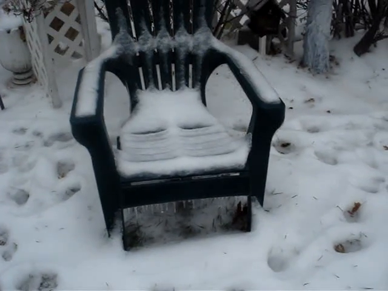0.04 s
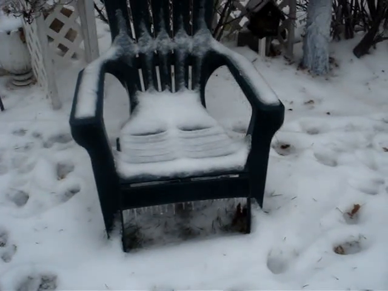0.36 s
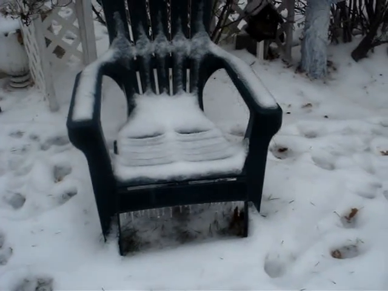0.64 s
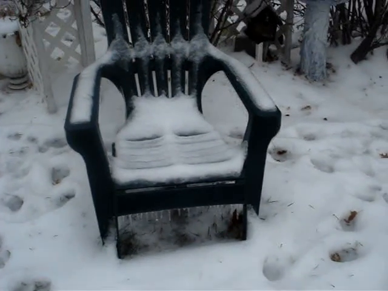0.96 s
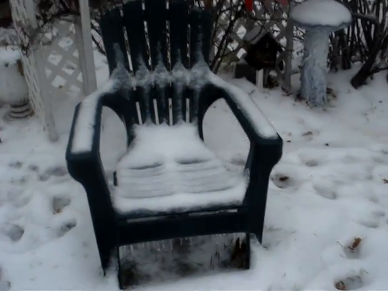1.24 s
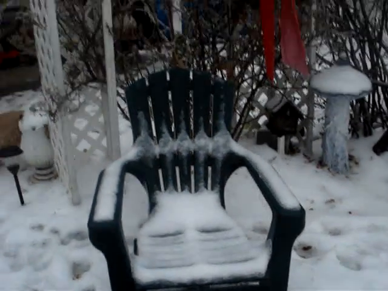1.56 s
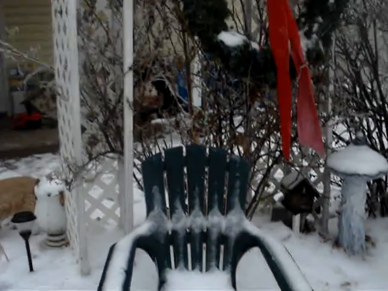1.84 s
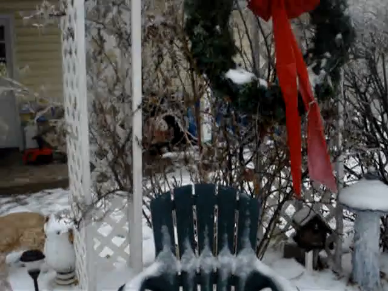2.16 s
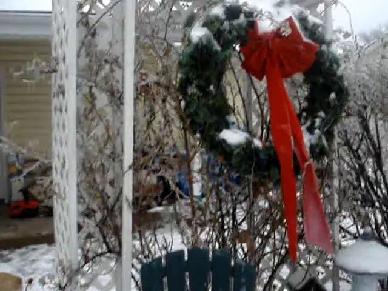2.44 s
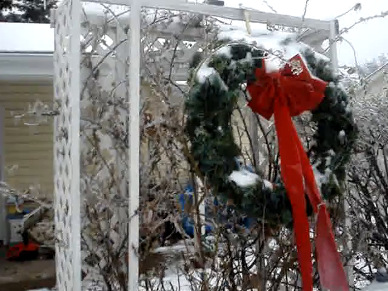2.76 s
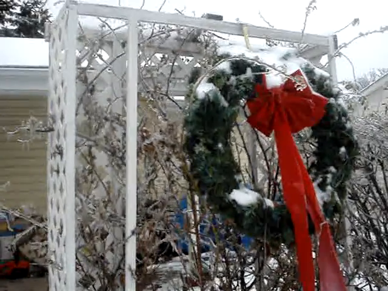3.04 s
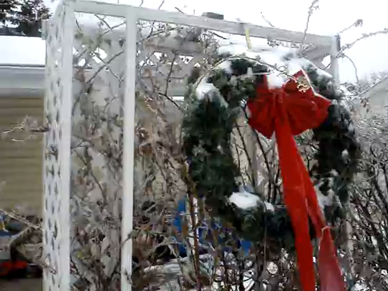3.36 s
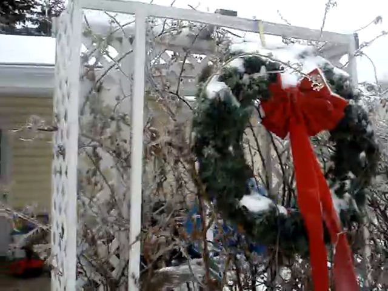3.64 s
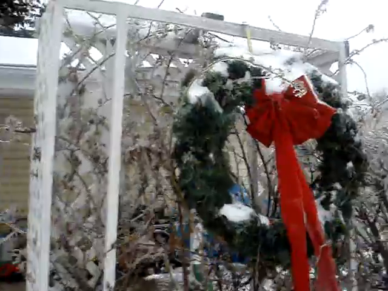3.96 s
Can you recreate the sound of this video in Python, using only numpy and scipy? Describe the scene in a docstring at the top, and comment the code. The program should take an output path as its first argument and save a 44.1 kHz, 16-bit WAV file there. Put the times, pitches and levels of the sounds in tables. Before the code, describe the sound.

Footsteps crunch on ice-crusted snow in a garden. The crust first cracks and scuffs as someone shifts, then come two slow steps, one crisp, one deeper. Freezing rain hisses faintly, and the hand-held microphone picks up soft bumps.

```python
"""Freezing rain hisses on a snowy garden throughout. At first someone shifts on ice-crusted snow:
the crust cracks and scuffs, ice ticks nearby, and a hand-held camera gives soft bumps and a faint scrape.
Just after 2 s comes a slow, crisp step: the crust crumbles into grains and the snow under it gives way
in short hollow pops. A second, deeper step follows near 3.4 s."""
import sys
import numpy as np
from scipy import signal
from scipy.fft import rfft, irfft, next_fast_len
from scipy.io import wavfile
from scipy.ndimage import map_coordinates

SR = 44100
rng = np.random.default_rng(int(sys.argv[2]) if len(sys.argv) > 2 else 0)


def generate_wav(signal):
    """Clip the signal to [-1, 1] and save it as 16-bit WAV at the path in sys.argv[1]."""
    frames = np.transpose(np.atleast_2d(signal))
    scaled = np.clip(frames, -1, 1) * 32767
    pcm = np.round(scaled).astype(np.int16)
    wavfile.write(sys.argv[1], SR, pcm)


N = 176400
T = np.arange(N) / SR
EVENT_T = T[:SR // 4]  # seconds since the start of one short sound


def amp(db):
    """Decibels to gain."""
    return 10 ** (np.asarray(db) / 20)


def unit(x):
    """Scale to rms 1."""
    return x / np.sqrt(np.mean(x ** 2) + 1e-20)


def eq_curve(points, hz):
    """Gain in dB at hz, joining (Hz, dB) points on a log frequency axis."""
    freqs, gains = np.transpose(points)
    return np.interp(np.log(hz + 1), np.log(freqs + 1), gains)


def coloured(x, gain_db):
    """Equalise x with a dB gain that is a function of frequency, then scale to rms 1."""
    hz = np.fft.rfftfreq(len(x), 1 / SR)
    return unit(irfft(rfft(x) * amp(gain_db(hz)), len(x)))


def fader(points):
    """A gain ride through (seconds, dB) points, silent before and after."""
    return amp(np.interp(T, *np.transpose(points), left=-120, right=-120))


def add(track, start, sound):
    """Mix a sound into the track, start seconds in."""
    part = track[max(0, int(start * SR)):][:len(sound)]
    part += sound[:len(part)]


def wobble(per_s):
    """A smooth curve through per_s random values a second."""
    return map_coordinates(rng.standard_normal(400), [T * per_s], mode="mirror")


def grains(per_s, spread_db, length, band_count=5):
    """Crackle at rms 1: grains of several sizes, each size falling per_s times a second in its own band."""
    hits = rng.random((band_count, length)) < per_s / SR
    polarity = rng.choice([-1, 1], hits.shape)
    strength = amp(spread_db * np.minimum(rng.exponential(size=hits.shape), 3))
    hz = np.fft.rfftfreq(length, 1 / SR)
    centres_hz = np.geomspace(700, 8000, band_count)
    bands = [np.sqrt(np.interp(hz, centres_hz, own)) for own in np.eye(band_count)]
    spectra = rfft(hits * polarity * strength) * bands
    return unit(irfft(spectra.sum(axis=0), length))


def pulse(hz, cycles):
    """A heavily damped ring whose envelope peaks after the given number of cycles."""
    age = EVENT_T * hz / cycles
    return age ** 2 * np.exp(2 * (1 - age)) * np.sin(2 * np.pi * hz * EVENT_T)


# The level ride of the rain. Each row: time in seconds, level in dB.
RAIN_RIDE = [(0, -47), (.3, -49.5), (.7, -49.5), (.85, -49.5), (1.2, -49), (1.4, -47.5), (1.65, -47.5),
             (2.0, -47.5), (2.7, -48), (3.3, -47), (3.85, -48.5), (4.0, -48.5)]
# The tone of the far wash and of the near patter. Each row: frequency in Hz, relative gain in dB.
WASH_EQ = [(20, -14), (45, -0.5), (75, 2), (160, 1), (350, 2), (520, 2), (750, -1.5), (1500, -3),
           (2300, -6), (3500, -10), (5000, -17.5), (7000, -20), (10000, -30)]
PATTER_EQ = [(200, -26), (900, 3.5), (2000, -2), (3800, -4.5), (6500, -7), (10000, -16.5)]
def rain():
    """The bed: a far wash of sleet, with nearer pellets pattering on ice and twigs."""
    wash = coloured(rng.standard_normal(N), lambda hz: eq_curve(WASH_EQ, hz))
    wash *= amp(.5 * wobble(per_s=25.16))
    pellets = grains(per_s=700, spread_db=2.5, length=N)
    patter = coloured(pellets, lambda hz: eq_curve(PATTER_EQ, hz))
    patter *= amp(-6 + 2.5 * wobble(per_s=29.94))  # sits under the wash and flutters more
    return amp(np.interp(T, *np.transpose(RAIN_RIDE))) * (wash + patter)


# The level ride of the scrape. Each row: time in seconds, level in dB.
SCRAPE_RIDE = [(1.3, -61), (1.43, -56), (1.55, -56), (1.68, -54), (1.78, -63), (1.95, -58)]
def scrape(centre_hz=1500, half_width_hz=160):
    """Light rubbing in one narrow resonance as the camera tilts up."""
    friction = rng.standard_normal(N)
    band = coloured(friction, lambda hz: -20 * np.log10(1 + ((hz - centre_hz) / half_width_hz) ** 2))
    return band * fader(SCRAPE_RIDE)


# Soft low bumps. Each row: start in seconds, level in dB, pitch in Hz.
SOFT_BUMPS = [(.54, -34.5, 125), (1.685, -36, 123), (1.82, -40, 120), (1.841, -46, 85), (1.904, -42.5, 75),
              (2.11, -39, 160), (2.371, -45, 90), (2.499, -31, 114), (2.52, -43, 96), (2.746, -39, 90),
              (2.786, -42, 55), (2.812, -42, 115), (2.838, -39.5, 54), (2.842, -34, 132), (2.895, -41, 60),
              (2.99, -45, 75), (3.068, -43, 150)]
def bumps():
    """Dull bumps of the feet and of the hand on the camera."""
    out = np.zeros(N)
    for start, db, pitch in SOFT_BUMPS:
        add(out, start, amp(db) * pulse(pitch, cycles=.56))
    return out


def garden(x, wet_db=-16.5, t60_s=.091):
    """Fence and house scatter a short, weak tail behind the direct sound."""
    tail = rng.standard_normal(len(EVENT_T)) * amp(-60 * EVENT_T / t60_s)
    return x + amp(wet_db) * signal.fftconvolve(x, tail / np.linalg.norm(tail))[:N]


# Ice ticks. Each row: start in seconds, level in dB, pitch in Hz, rough treble slope in dB per octave,
# ring T60 in seconds.
ICE_TICKS = [(.4185, -27.5, 2400, -11, .028), (0.815, -37, 3750, -22, 0.037), (0.8156, -41, 2480, -21, .02),
             (.904, -39, 2500, -13.5, 0.013), (1.0435, -41, 2090, -16, 0.086),
             (1.044, -40, 3480, -24, 0.093), (1.291, -38.5, 3300, -2, .015),
             (1.447, -41.5, 2330, -13.5, .02), (1.5257, -35, 1990, -11, 0.02), (1.824, -37, 2700, -3, .015),
             (2.104, -37.5, 1350, -27, 0.028), (2.1189, -37, 1360, -19, .02),
             (2.151, -36.5, 2400, -12, .015), (2.185, -37, 2400, -10, .01), (2.204, -33, 1780, -24, .025),
             (2.2379, -30, 1180, -12, .04), (2.3818, -38.5, 1900, -6, .015),
             (2.533, -35.5, 2190, -13, 0.014), (2.748, -32.5, 1250, -14, 0.028),
             (2.842, -34.5, 5170, -6.5, 0.014), (3.035, -40.5, 2400, -7, .02),
             (3.074, -39, 1270, -8.5, .02), (3.1755, -34, 1290, -14, 0.028),
             (3.197, -40.5, 1660, -11.5, .02), (3.222, -38.5, 1500, -11, .02), (3.30, -41, 2390, -14, .02),
             (3.408, -26.5, 1060, -14, .02), (3.4308, -37, 3000, -9, .01), (3.4705, -28, 1300, -10, .025),
             (3.479, -31.5, 2220, -17.5, .04), (3.5292, -33, 1330, -10, .025),
             (3.543, -33, 1540, -9, 0.018), (3.609, -40, 1420, -11, .02), (3.622, -32, 1810, -13, 0.027),
             (3.80, -37.5, 1900, -11.5, 0.016)]
def ticks(body_db=-6.5, ring_db=-5, snap_t60_s=.021):
    """Small pieces of ice snap; most are dry, a few ring on as a tiny ping."""
    out = np.zeros(N)
    fade = amp(-60 * EVENT_T / snap_t60_s)
    for start, db, pitch, treble, ring_t60 in ICE_TICKS:
        tone = [(pitch / 10, 2 * body_db), (pitch / 2, body_db), (pitch, 0),
                (pitch * 1.5, treble / 4), (pitch * 12, 3 * treble)]
        snap = fade * coloured(rng.standard_normal(len(EVENT_T)), lambda hz: eq_curve(tone, hz))
        ring = np.sin(2 * np.pi * pitch * EVENT_T) * amp(ring_db - 60 * EVENT_T / ring_t60)
        add(out, start, amp(db) * (snap + ring))
    return out


# Collapsing snow pockets. Each row: start in seconds, level in dB, pitch in Hz, attack in cycles.
SNOW_POPS = [(.06, -34.5, 260, 0.69), (.074, -35.5, 356, 0.94), (.198, -39.5, 379, 0.7),
             (0.4174, -34.5, 720, 0.62), (.452, -37, 295, 0.85), (.463, -41, 390, 1.7),
             (.66, -42.5, 440, 0.88), (.698, -34.5, 334, 0.67), (1.824, -37.5, 380, 1.3),
             (2.1046, -24.5, 440, 0.83), (2.109, -35.5, 260, 0.89), (2.118, -31.5, 400, 0.49),
             (2.151, -30.5, 650, 0.6), (2.170, -30, 484, 0.75), (2.2045, -28, 670, 0.9),
             (2.207, -25.5, 342, 0.65), (2.214, -30, 750, 0.71), (2.246, -33, 647, 1.3),
             (2.398, -24.5, 430, 0.77), (2.412, -25, 640, 0.67), (2.44, -29.5, 428, 0.73),
             (2.489, -27, 576, 0.81), (2.5596, -28.5, 493, 0.78), (2.6152, -34, 342, 0.77),
             (2.6196, -21.5, 544, 0.7), (2.749, -26, 404, 1.24), (2.81, -33, 533, 0.66),
             (2.903, -35.5, 765, 1.2), (3.0343, -27.5, 380, 0.62), (3.073, -28, 780, 0.82),
             (3.075, -30, 262, 0.69), (3.087, -28, 288, 0.56), (3.098, -31.5, 323, 0.36),
             (3.4075, -19, 710, 0.87), (3.430, -24.5, 720, 0.89), (3.4593, -28, 420, 0.63),
             (3.463, -29, 746, .8), (3.4856, -28, 775, 0.47), (3.4905, -19.5, 700, 0.88),
             (3.515, -25.5, 566, 0.82), (3.542, -25.5, 620, 0.7), (3.554, -26.5, 600, 0.85),
             (3.560, -28, 620, 0.88), (3.576, -26.5, 440, 0.74), (3.5894, -29.5, 480, .8),
             (3.607, -28.5, 430, 0.72), (3.618, -23.5, 600, 0.89), (3.6214, -25.5, 453, 1.06),
             (3.677, -32, 252, 0.77), (3.7202, -28, 500, 0.8), (3.737, -30, 525, 0.91),
             (3.745, -28, 680, 0.48), (3.756, -32, 574, 0.94), (3.817, -36.5, 255, 0.49)]
# The tone of the crack on each pop. Each row: frequency in Hz, relative gain in dB.
POP_CRACK_EQ = [(80, -26), (250, -4), (450, 0), (1200, -1), (2500, -13), (5000, -26), (10000, -40)]
def pops(crack_db=-10, crack_t60_s=.018):
    """A pocket of snow gives way: one hollow pulse and a short crack."""
    out = np.zeros(N)
    for start, db, pitch, cycles in SNOW_POPS:
        crack = coloured(rng.standard_normal(len(EVENT_T)), lambda hz: eq_curve(POP_CRACK_EQ, hz))
        crack *= amp(crack_db - 60 * EVENT_T / crack_t60_s)
        add(out, start, amp(db) * (pulse(pitch, cycles) + crack))
    return out


# Dry clicks in the crust. Each row: start in seconds, level in dB, pitch in Hz.
CRUST_FRACTURES = [(.4171, -22, 4400), (.4186, -17.5, 2880), (0.4198, -20.5, 2600), (.4212, -26, 3200),
                   (.4477, -26, 3000), (2.1515, -29, 1300), (2.2375, -22, 4200), (2.2392, -26, 1700),
                   (2.3825, -27, 1700), (2.4, -22, 2280), (2.4386, -22, 1900), (2.442, -24, 1200),
                   (2.4609, -19, 1900), (2.5333, -27.5, 2700), (3.033, -26, 1500), (3.408, -22.5, 1140),
                   (3.4725, -23, 2200), (3.4745, -23, 2700), (3.4855, -24, 1500), (3.5772, -26.5, 2200)]
def fractures():
    """A crack jumps through the crust: one hard click that dies at once."""
    out = np.zeros(N)
    for start, db, pitch in CRUST_FRACTURES:
        add(out, start, amp(db) * pulse(pitch, cycles=.71))
    return out


# The crust breaks or scuffs. Each row: start in seconds, level in dB, attack in seconds, T60 in seconds,
# brightness in dB per octave, low cut in Hz.
CRUST_BREAKS = [(.012, -42.5, 0.0032, 0.099, 2, 200), (0.047, -41.5, 0.0088, 0.17, 1.5, 170),
                (.444, -36, 0.006, .09, -1.5, 200), (.453, -30.5, 0.007, 0.046, 1, 179),
                (.472, -39, 0.012, 0.047, -2, 200), (.533, -38.5, 0.015, 0.025, 1.5, 198),
                (0.644, -45.5, 0.0041, 0.32, 7.5, 250), (.955, -47.5, 0.0099, 0.42, -1, 1200),
                (1.281, -39, 0.012, 0.081, -1, 905), (1.305, -44.5, 0.0032, 0.1, -3, 250),
                (1.55, -44.5, 0.0053, 0.13, -0.5, 1200), (1.6, -42.5, 0.011, 0.26, -2.5, 1300),
                (2.2346, -26, 0.004, 0.1, -0.5, 800), (2.253, -36, .008, 0.15, 0.5, 398),
                (2.382, -39.5, 0.0027, 0.096, -1, 350), (2.436, -30, 0.003, 0.04, -4.5, 604),
                (2.458, -29, 0.0037, 0.045, -6, 890), (3.028, -35, 0.0033, 0.22, -4.5, 250),
                (3.07, -40.5, 0.025, 0.096, -2, 170), (3.37, -38, 0.0034, 0.096, -5, 920),
                (3.465, -34, 0.0038, 0.071, -1.5, 704), (3.575, -31.5, 0.0023, 0.072, -2.5, 292),
                (3.618, -30, 0.0056, 0.027, -3.5, 298), (3.677, -36, 0.0018, 0.071, -2, 248)]
# The base tone of the shards. Each row: frequency in Hz, relative gain in dB.
SHARD_EQ = [(60, -12), (150, 2.5), (350, 5.5), (750, 0), (1200, 1.5), (1800, -2.5), (2400, -0.5),
            (3200, -1), (4500, -2), (6200, -8), (7800, -8.5), (10000, -16)]
def breaks(dust_gain=.4):
    """A plate of crust shatters: a quick swell of bright grains that fades; small plates have no bass."""
    out = np.zeros(N)
    for start, db, attack, t60, brightness, low_cut_hz in CRUST_BREAKS:
        def tone(hz):
            tilt = brightness * np.log2(1 + hz / 200)
            bass_loss = 10 * np.log10(1 + (low_cut_hz / (hz + 1)) ** 4)
            return eq_curve(SHARD_EQ, hz) + tilt - bass_loss
        shards = grains(per_s=1100, spread_db=2, length=len(EVENT_T))
        shards += dust_gain * rng.standard_normal(len(EVENT_T))
        swell = np.minimum(EVENT_T / attack, 1)
        decay = amp(-60 * np.maximum(EVENT_T - attack, 0) / t60)
        add(out, start, amp(db) * swell * decay * coloured(shards, tone))
    return out


def packing_snow(per_s=220, centre_hz=503, spread_octaves=.7):
    """Snow packs down in a dense, uneven run of small pops, at rms 1."""
    out = np.zeros(N)
    for slot, (jitter, detune, strength) in enumerate(rng.uniform(-1.02, 1, (int(per_s * N / SR), 3))):
        pitch = centre_hz * 2 ** (spread_octaves * detune)
        add(out, (slot + jitter) / per_s, strength * pulse(pitch, cycles=.91))
    return unit(out)


# The crunch under the crisp first step and the deeper second. Each row: time in seconds, level in dB.
CRISP_RIDE = [(2.13, -47.5), (2.18, -52.5), (2.29, -54), (2.33, -42), (2.378, -45), (2.398, -34.5),
              (2.428, -39.5), (2.44, -30), (2.47, -41), (2.50, -42.5), (2.545, -44.5), (2.58, -50.5),
              (2.61, -43), (2.632, -40.5), (2.65, -71)]
DEEP_RIDE = [(3.395, -49.5), (3.42, -43.5), (3.444, -36), (3.456, -40), (3.472, -30), (3.492, -31.5),
             (3.505, -38.5), (3.55, -39.5), (3.58, -41.5), (3.60, -40.5), (3.622, -49), (3.638, -49),
             (3.74, -53.5), (3.78, -55.5), (3.82, -43.5), (3.85, -56.5)]
# The tone of each crunch. Each row: frequency in Hz, relative gain in dB.
CRISP_EQ = [(60, -39), (150, -16), (300, -8), (500, -0.5), (700, 1), (930, -4), (1400, -3), (2100, -2.5),
            (3100, -11.5), (4300, -6), (6000, -12.5), (10000, -25)]
DEEP_EQ = [(60, -22), (150, -3), (300, 2.5), (480, -4.5), (700, 2), (1050, 1), (1600, -3.5), (2400, -1),
           (3100, -10.5), (3900, -8), (4900, -14.5), (6200, -14), (10000, -28)]
def steps(dust_gain=.2, pack_lag_s=.018):
    """Under the foot the crust crumbles into grains and the snow packs just after, less on the crisp step."""
    out = np.zeros(N)
    packing = packing_snow()
    for ride, eq, pack_db in (CRISP_RIDE, CRISP_EQ, -10), (DEEP_RIDE, DEEP_EQ, -7):
        weight = fader(ride)
        crumbs = grains(per_s=600, spread_db=3, length=N) + dust_gain * rng.standard_normal(N)
        roughness = amp(1.7 * wobble(per_s=130))
        out += weight * coloured(crumbs, lambda hz: eq_curve(eq, hz)) * roughness
        late_weight = np.interp(T - pack_lag_s, T, weight)
        out += amp(pack_db) * late_weight * packing
    return out


def scene():
    """The mono mix: footwork with the garden's tail on it, over bumps, scrape and rain."""
    footwork = steps() + breaks() + fractures() + ticks() + pops()
    return (garden(footwork) + bumps() + scrape() + rain())[None]


def record(dry):
    """A brick-wall high cut takes the air off the mix."""
    high_cut_hz = 10250
    size = next_fast_len(N + SR // 2)
    passband = np.fft.rfftfreq(size, 1 / SR) < high_cut_hz
    return irfft(rfft(dry, size) * passband, size)[..., :N]


dry = scene()
out = record(dry)
generate_wav(out)
```